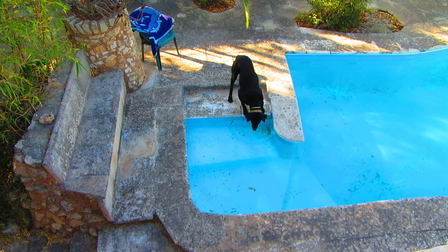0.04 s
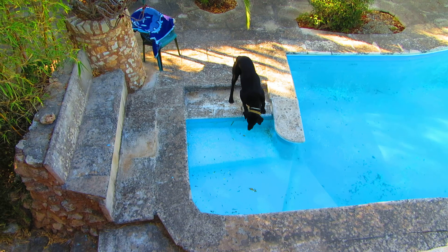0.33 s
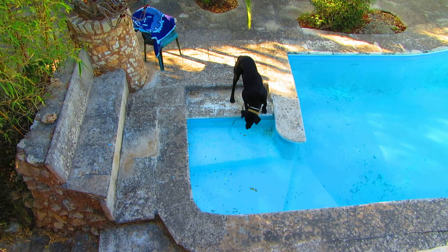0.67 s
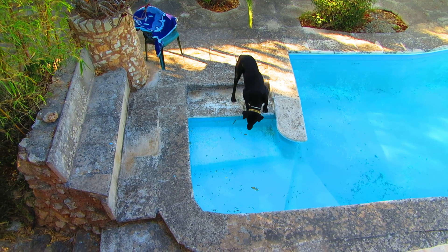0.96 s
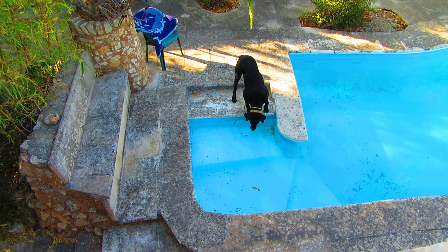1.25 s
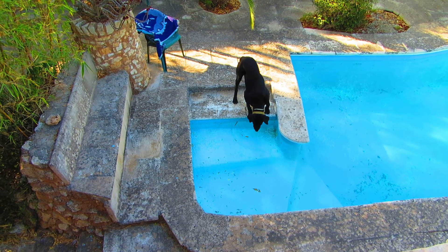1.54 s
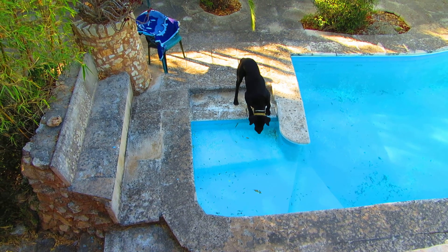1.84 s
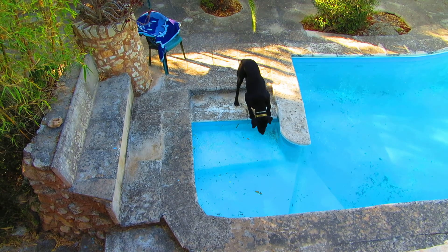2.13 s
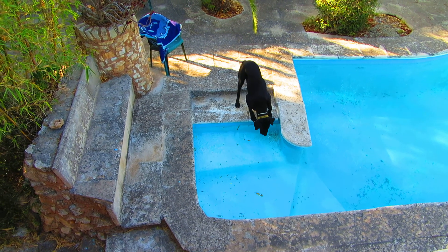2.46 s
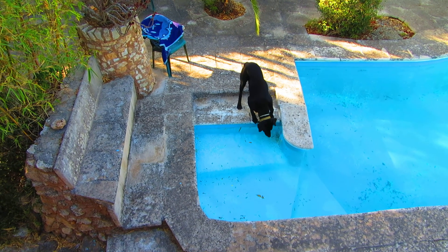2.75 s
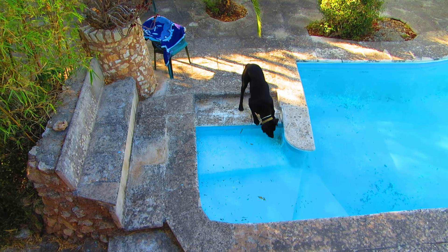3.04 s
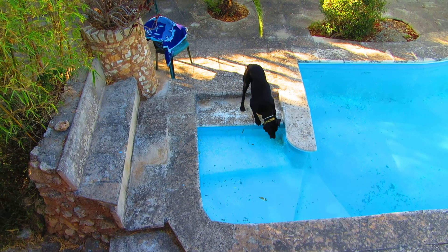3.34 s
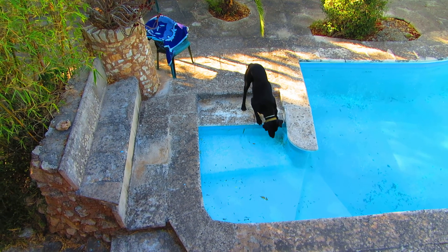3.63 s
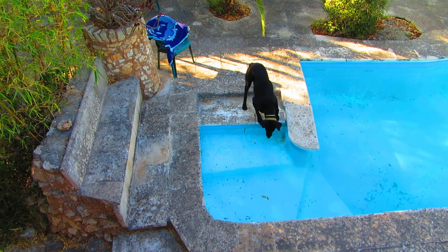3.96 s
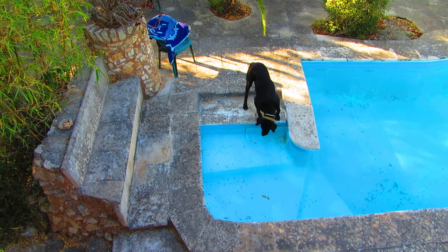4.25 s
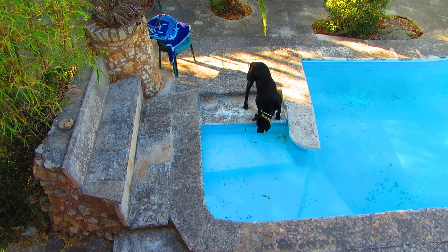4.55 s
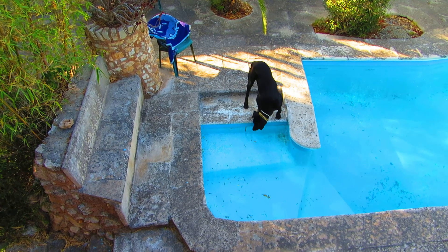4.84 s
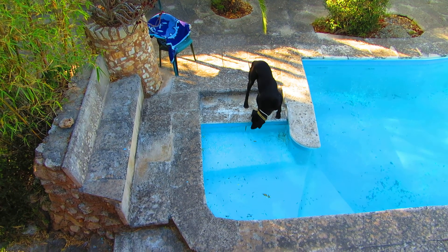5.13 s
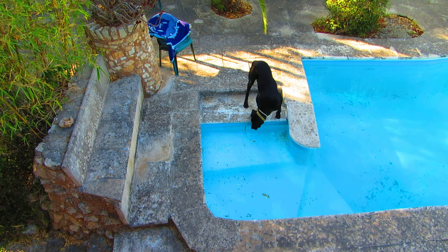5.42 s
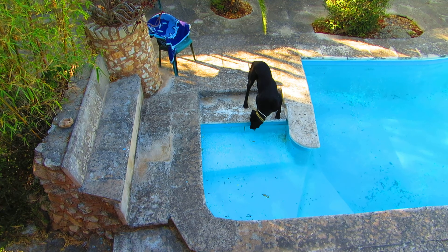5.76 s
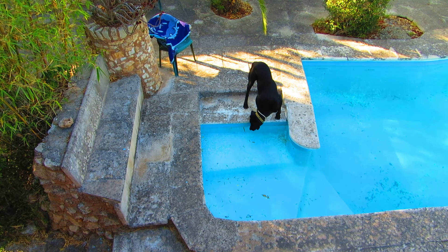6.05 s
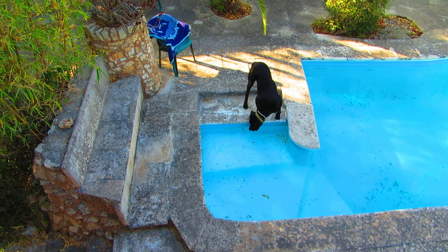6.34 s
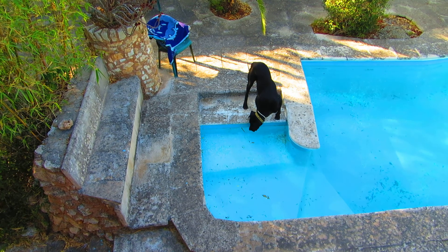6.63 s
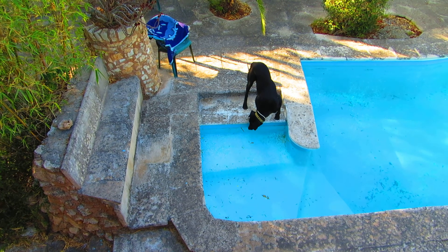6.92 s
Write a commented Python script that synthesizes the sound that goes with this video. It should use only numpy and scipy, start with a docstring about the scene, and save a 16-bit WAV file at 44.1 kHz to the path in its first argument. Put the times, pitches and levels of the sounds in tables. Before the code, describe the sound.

A dog laps water from the step of an outdoor swimming pool, heard from a terrace above and slightly right of centre. The lapping starts right away and keeps an even pace of about three laps a second until the end, at about 7 seconds. Each lap has two quick parts, the tongue slapping in and the jaw closing on the water, making small fizzy splashes, wet clicks, round plops and soft hollow gulps, with little gurgles and drips between. A sharper click stands out at about 0.5 seconds. The laps are somewhat louder from around 3 seconds, with the brightest plops near 5.5 seconds and rounder ones between 5 and 6.6 seconds. Nearby stone adds a faint, short echo. Underneath, a soft, wide outdoor hush and a very faint, thin, high whine rise slightly over the first two seconds, then hold steady.

```python
"""Dog drinking from a pool

A dog laps from the step of a swimming pool, about three laps a second; the microphone is on a terrace
above. Tongue and jaw trap air pockets that plop and click, and the water that falls back splashes in
swarms of tiny bubbles. Stone walls answer faintly, over a soft outdoor hush and a thin camera whine."""
import sys
import numpy as np
from scipy import signal
from scipy.fft import rfft, irfft
from scipy.io import wavfile

SR = 44100
rng = np.random.default_rng(int(sys.argv[2]) if len(sys.argv) > 2 else 0)


def store_pcm(level_fs):
    """Save levels as 16-bit WAV."""
    pcm = np.round(np.clip(level_fs, -1, 1) * 32767).astype(np.int16)
    wavfile.write(sys.argv[1], SR, np.atleast_2d(pcm).T)


N = 312669

# Laps at the pool step: the tongue slaps in, then the jaw snaps shut on the water it lifts.
# tongue_s, splash_db, bright_db, gulp_db, jaw_s, splash_db, bright_db, gulp_db
LAPS = [(.083, -49, 0, -55, .159, -53, 0, -60), (.401, -43, -1, -45, .478, -47, -2, -42),
        (.744, -45, 0, -50, .85, -48, 1, -55), (1.046, -41, -1, -48, 1.162, -48, 0, -55),
        (1.381, -48, 0, -52, 1.479, -42.5, 0, -31), (1.765, -43.5, 2, -38, 1.872, -47, 0, -55),
        (2.086, -43, 0, -40, 2.187, -45, 1, -37), (2.409, -42, 0, -44, 2.494, -42.5, 1, -38),
        (2.77, -45, 2, -43, 2.874, -43, 0, -54), (3.094, -38.5, -1, -36, 3.185, -42, 0, -35),
        (3.423, -38, 0, -41, 3.519, -41.5, -1, -37), (3.796, -42, -1, -43, 3.92, -41, -1, -54),
        (4.14, -36.5, 0, -38, 4.245, -44, -1, -42), (4.463, -41, 2, -35, 4.545, -44.5, 1, -55),
        (4.833, -49, 1, -58, 4.935, -41, 1, -50), (5.147, -39, -2, -55, 5.258, -43, 0, -42),
        (5.519, -42.5, 1, -53, 5.625, -43, -1, -46), (5.845, -39, 0, -38, 5.94, -43.5, -1, -55),
        (6.204, -39, -1, -47, 6.294, -43, -1, -54), (6.523, -36.5, 0, -46, 6.608, -41, 0, -54),
        (6.906, -42.5, -1, -55, 7.005, -41.5, 1, -55)]
# Splash shape of each kind of stroke: attack_s, hold_s, decay_s, slosh_db, splatter_db, spray_db
TONGUE_SHAPE = (0.002, 0.033, 0.028, -3, -2.8, -8.8)
JAW_SHAPE = (0.0015, 0.066, 0.027, -3.4, -1.2, -4.6)
def strokes():
    """Tongue and jaw take turns: start_s, splash_db, bright_db, gulp_db, shape for every stroke."""
    for lap in LAPS:
        yield *lap[:4], TONGUE_SHAPE
        yield *lap[4:], JAW_SHAPE


# Air pockets at the muzzle, dry clicks to round plops: start_s, level_db, pitch_hz, swell_cycles
AIR_POCKETS = [(0.162, -36, 9920, 1.2), (0.242, -47, 2130, 4), (0.275, -42, 2210, 1.3),
               (0.466, -20, 5800, .7), (0.507, -35, 2610, 2.7), (0.669, -36, 2180, .8),
               (0.691, -42, 1105, 3.6), (0.746, -31, 2370, 1), (0.763, -37, 1060, 1.4),
               (0.833, -32, 12000, 1), (0.917, -43, 850, 2), (0.994, -42, 1850, 1), (1.049, -35, 3000, 1),
               (1.091, -42, 604, 3.3), (1.169, -34, 1150, 1.5), (1.229, -33, 1180, 3.5),
               (1.317, -41, 2170, 5), (1.504, -36, 1130, 2), (1.505, -35, 460, 1), (1.549, -32, 1210, 1.5),
               (1.673, -40, 1230, 2.6), (1.733, -40, 600, 1), (1.803, -34, 5300, 2.6),
               (1.886, -32, 3050, 3), (1.894, -34, 2660, 3.4), (2.06, -26, 2950, .7), (2.065, -34, 2200, 2),
               (2.085, -29, 6670, 1.4), (2.122, -34, 4620, 3.7), (2.135, -28, 1250, 3),
               (2.135, -31, 1750, 1.6), (2.257, -34, 1070, 2.6), (2.509, -34, 540, 1.4),
               (2.529, -35, 1030, 1.3), (2.573, -29, 8200, 2.5), (2.776, -23, 1940, 1.4),
               (2.796, -40, 580, 3.7), (2.906, -28, 2100, 2.8), (2.911, -29, 3600, 2),
               (3.185, -33, 2840, 4), (3.251, -31, 6530, 3), (3.26, -30.5, 1090, 2),
               (3.423, -31, 1770, 1.4), (3.428, -33, 1290, 5), (3.459, -30, 1820, 1.3),
               (3.528, -32, 1600, 1.3), (3.797, -24, 1790, 1.3), (3.804, -33, 2740, 4),
               (3.811, -33, 1230, 3), (3.922, -26, 3830, 2.3), (3.942, -31, 1190, 1.3),
               (3.942, -25, 4200, .6), (3.963, -28, 2450, 7), (4.069, -35, 2900, 2), (4.111, -39, 3550, 3),
               (4.144, -28.5, 2360, 1.6), (4.16, -31, 2950, 3), (4.171, -28, 2660, 1.6),
               (4.224, -28, 3280, 1.7), (4.47, -30, 575, 2.1), (4.471, -24, 6500, 1.4),
               (4.471, -27, 2170, .7), (4.617, -39, 960, 2.5), (4.763, -39, 2800, 1.5),
               (4.796, -35, 6800, 1.5), (4.837, -37, 6000, 1.5), (4.855, -35, 650, 2),
               (4.971, -33, 2270, 1.1), (5.003, -33, 1300, 1), (5.106, -37, 3300, 1.3),
               (5.151, -29, 2400, 1), (5.153, -35, 680, 3.5), (5.173, -22, 700, 1), (5.181, -35, 3700, 5),
               (5.26, -25.5, 582, 1.3), (5.261, -28, 3600, 6), (5.295, -33.5, 1210, 1.8),
               (5.308, -32, 3300, 2.5), (5.32, -32, 1153, 2.4), (5.482, -35, 2100, 1.3),
               (5.52, -22.5, 2920, 2.1), (5.534, -18.5, 3400, 1.8), (5.548, -30.5, 687, 1.7),
               (5.625, -20.5, 2830, 3.4), (5.626, -19, 3900, 2), (5.654, -28, 6700, 1.9),
               (5.695, -25, 3400, 1.2), (5.76, -37, 770, 1), (5.872, -31, 655, 2.8),
               (5.883, -28, 2940, 2.6), (5.944, -30, 680, 1.6), (5.993, -31, 820, 1.6),
               (6.015, -34, 1230, 2.5), (6.153, -34, 746, 1.3), (6.206, -26, 1350, .7),
               (6.22, -22, 632, 2.1), (6.228, -28, 2900, 2.1), (6.297, -32, 7000, 1.5),
               (6.344, -30.5, 910, 1.9), (6.37, -28, 1090, 3), (6.37, -25, 3540, 1.8),
               (6.526, -27, 2510, 3.5), (6.526, -26, 4900, 2), (6.559, -28, 596, 1),
               (6.561, -26, 1177, 1.8), (6.614, -29, 3360, 2.7), (6.624, -30, 3050, 2.6),
               (6.699, -28, 1210, .8), (6.848, -41, 830, 1.6), (6.928, -37, 693, 2.7),
               (7.046, -29, 3600, 4)]
def plops(rise=0.018, tick_db=-18, tick_s=0.0028, daughter_db=-17, daughter_wait_s=0.012):
    """Each trapped pocket starts with a wet tick and bursts, leaving a smaller, higher bubble."""
    pockets, ticks = np.zeros(N), np.zeros(N)
    tick_fade = np.exp(-np.arange(SR // 20) / (SR * tick_s))
    for start_s, level_db, hz, cycles in AIR_POCKETS:
        phase, wait, size = rng.random(3)
        add(pockets, start_s, from_db(level_db) * bubble(hz, cycles / hz, rise, phase))
        daughter = bubble(hz * 2 ** (0.4 * size), cycles / hz, rise, wait)
        add(pockets, start_s + daughter_wait_s * (.5 + wait), from_db(level_db + daughter_db) * daughter)
        add(ticks, start_s, from_db(level_db + tick_db) * tick_fade)
    return pockets + ticks * noise(WATER_COLOUR)


# Slosh, splatter and spray at the water's surface: low_hz, high_hz, bubbles_per_s, swell_cycles
SWARMS = [(333, 1520, 900, 1.82), (1512, 5180, 1400, 2.13), (5100, 13400, 1100, 1.11)]
def splashes(gain_db=-5, settle_db=-13, settle_s=0.18):
    """Each stroke wakes all three swarms; they hold, then die down unevenly as the water settles."""
    out, t = np.zeros(N), np.arange(SR) / SR
    settling = from_db(settle_db) * np.exp(-t / settle_s)
    for band, (low_hz, high_hz, per_s, cycles) in enumerate(SWARMS):
        stir = np.zeros(N)
        for start_s, splash_db, bright_db, _, shape in strokes():
            attack_s, hold_s, decay_s, *bands_db = shape
            attack = 1 - np.exp(-t / attack_s)
            fall = np.exp(-np.maximum(t - hold_s, 0) / decay_s)
            level_db = splash_db + bands_db[band] + (band - 0.5) * bright_db + gain_db
            add(stir, start_s, from_db(level_db) * attack * np.maximum(fall, settling))
        out += stir * clumps() * swarm(low_hz, high_hz, per_s, cycles, spread_db=2.6)
    return out


def clumps(spread_db=6.5, step_s=.005):
    """Water breaks up in fits and starts: a unit-power gain that jumps every few milliseconds."""
    steps = np.arange(N) / (step_s * SR)
    jumps = np.interp(steps, np.arange(N), rng.uniform(-1.4, 1, N))
    return unit_power(from_db(spread_db * jumps))


# Colour of the splashing water: frequency_hz, level_db
WATER_COLOUR = [(250, -8), (420, -12), (570, 5), (800, -3.5), (1220, 1), (1700, -2), (2900, -1.5),
                (4500, -5.5), (7000, -5), (10000, -13.5), (15000, -21.5)]
def swarm(low_hz, high_hz, per_s, cycles, spread_db, pitches=20):
    """Tiny bubbles ring at random times, strengths and pitches; unit power."""
    strengths = from_db(spread_db * np.minimum(rng.exponential(1, N), 4)) * rng.choice([-1, 1], N)
    born = rng.random(N) < per_s / SR
    pitch_index = rng.integers(0, pitches, N)
    out = np.zeros(N)
    for k in range(pitches):
        hz = low_hz * (high_hz / low_hz) ** ((k + .5) / pitches)
        grain = bubble(hz, cycles / hz, rise=0.039, phase=0)
        grain *= from_db(level_at(WATER_COLOUR, hz)) * np.sqrt(hz / np.sum(grain ** 2))
        for i in np.flatnonzero(born & (pitch_index == k)):
            add(out, i / SR, strengths[i] * grain)
    return unit_power(out)


def bubble(hz, swell_s, rise, phase):
    """An air pocket swells and dies away; its pitch climbs as it nears the surface."""
    age = np.arange(int(10 * swell_s * SR) + 2) / (swell_s * SR)
    pitch_hz = hz * (1 + rise * (np.minimum(age, 5) - 1.5))
    return age * np.exp(1 - age) * np.sin(2 * np.pi * (np.cumsum(pitch_hz) / SR + phase))


def gulps(cavity_hz=315, muzzle_hz=470, delay_s=0.029, thud_db=-2.5, rebound_db=-11.5, muzzle_db=-4.5):
    """After each stroke a large, damped cavity thuds and rebounds; the muzzle adds a hollow note."""
    out = np.zeros(N)
    for stroke_s, splash_db, _, gulp_db, _ in strokes():
        size, wait, phase = rng.random(3)
        start_s = stroke_s + delay_s
        detune = 2 ** ((size - .5) / 2)
        thud = bubble(cavity_hz * detune, swell_s=0.0012, rise=0.092, phase=phase)
        rebound = bubble(1.15 * cavity_hz * detune, swell_s=0.0012, rise=0.12, phase=wait)
        hollow = bubble(muzzle_hz * detune, swell_s=0.0025, rise=0.03, phase=wait)
        add(out, start_s, from_db(gulp_db + thud_db) * thud)
        add(out, start_s + 0.00603 + 0.00826 * wait, from_db(gulp_db + rebound_db) * rebound)
        add(out, start_s, from_db(splash_db + muzzle_db) * hollow)
    return out


def gurgles(count=5, delay_s=0.05, step_s=0.014, base_hz=1000, octaves_per_s=5, fade_db_per_s=130):
    """Water spilling from the closed jaw makes a short run of bubbles that rise in pitch and fade."""
    out = np.zeros(N)
    for *_, jaw_s, splash_db, _, _ in LAPS:
        for k, (wait, size, phase) in enumerate(rng.random((count, 3))):
            age_s = (k + wait) * step_s
            hz = base_hz * 2 ** (octaves_per_s * age_s + 0.7 * (size - .5))
            gain = from_db(splash_db - fade_db_per_s * age_s)
            add(out, jaw_s + delay_s + age_s, gain * bubble(hz, 2.4 / hz, rise=0.04, phase=phase))
    return out


def drips(gain_db=-62, dribble_db=4.5, lead_s=0.04, width_s=0.035):
    """Stray drops fall from the muzzle throughout; it dribbles as the mouth opens before each lap."""
    t = np.arange(N) / SR
    mouth_open = sum(np.exp(-((t - tongue_s + lead_s) / width_s) ** 2) for tongue_s, *_ in LAPS)
    dribble = from_db(dribble_db) * mouth_open * swarm(1500, 4400, per_s=160, cycles=1.8, spread_db=4)
    strays = swarm(640, 4530, per_s=110, cycles=2.66, spread_db=4.5)
    return from_db(gain_db) * (strays + dribble)


# Resonances of the stone corner beside the dog: pitch_hz, width_hz, gain_db
CORNER_MODES = [(571.7, 15, -2), (1217, 8, -2), (365, 6.8, -4.5)]
def corner(water):
    """The stone corner of the step rings on at a few pitches."""
    return sum(from_db(db) * resonance(water, hz, width_hz) for hz, width_hz, db in CORNER_MODES)


def wall_echoes(water, gain_db=-2, t60_s=0.36, early_db=17, early_s=0.0032, block=4096):
    """Quick reflections and a faint tail keep changing as the head moves and the water ripples."""
    t = np.arange(SR // 3) / SR
    decay = (from_db(-60 * t / t60_s) + from_db(early_db) * np.exp(-t / early_s)) * (t > .0012)
    window = np.sin(np.pi * np.arange(block) / block)
    padded = np.pad(water, (0, block))
    out = np.zeros((2, N))
    for channel in out:
        for i in range(0, N, block // 2):
            echoes = rng.standard_normal(len(t)) * decay
            echoes /= np.linalg.norm(echoes)
            add(channel, i / SR, signal.fftconvolve(window * padded[i:i + block], echoes))
    return from_db(gain_db) * out


# Open air on the terrace, mid and side at the microphone: frequency_hz, level_db
HUSH_MID = [(20, -17), (75, 0), (120, -6.5), (170, -7.5), (290, -9), (365, -6), (470, -13), (680, -5.5),
            (1200, -9), (2200, -11.5), (3600, -15), (6000, -17), (10000, -23), (15500, -28.5)]
HUSH_SIDE = [(20, 4), (48, 4), (100, 1), (250, 4.5), (480, 1.5), (680, 4.5), (1100, 2.5), (2000, -2),
             (3600, -8), (6000, -12.5), (10000, -18), (15500, -26.5)]
def hush(mid_db=-54.5, side_db=-47):
    """A wide outdoor hush: one noise common to both channels, a stronger one opposed between them."""
    return from_db(mid_db) * noise(HUSH_MID) + from_db(side_db) * noise(HUSH_SIDE) * [[1], [-1]]


# Two high tones as heard, harmonics 1 and 2: level_db, balance_db, right_lead_rad, waver_depth
WHINE_HARMONICS = [(-67, -13, 1, 0.14), (-70, -11, 0.068, 0.5)]
def whine(pitch_hz=7867, waver_hz=11):
    """Two thin, high tones of camera whine; the upper one wavers, the lower one barely."""
    out, t = np.zeros((2, N)), np.arange(N) / SR
    for harmonic, (level_db, balance_db, lead_rad, depth) in enumerate(WHINE_HARMONICS, 1):
        tone = np.sqrt(2) * np.sin(2 * np.pi * harmonic * pitch_hz * t + np.array([[0], [lead_rad]]))
        # the upper tone is heard to waver, the lower one barely
        waver = 1 + depth * np.sin(2 * np.pi * waver_hz * t)
        out += from_db(level_db) * pan(balance_db) * tone * waver
    return out


def from_db(db):
    """Decibels to gain."""
    return 10 ** (np.asarray(db) / 20)


def unit_power(x):
    """Scale to an rms of one."""
    return x / np.sqrt(np.mean(x ** 2) + 1e-20)


def level_at(spectrum, hz):
    """Read a spectrum's level in dB along a log-frequency axis."""
    freqs, levels = np.transpose(spectrum)
    return np.interp(np.log(np.maximum(hz, 1)), np.log(freqs), levels)


def pan(balance_db):
    """Left and right gains for a left-minus-right level."""
    return from_db(np.array([[.5], [-.5]]) * balance_db)


def add(track, start_s, sound):
    """Mix a sound into a track at a time."""
    start = max(0, round(start_s * SR))
    part = track[start:start + len(sound)]
    part += sound[:len(part)]


def noise(spectrum):
    """Steady noise of a given colour, unit power."""
    hz = np.arange(N // 2 + 1) * SR / N
    white = rfft(rng.standard_normal(N))
    return unit_power(irfft(white * from_db(level_at(spectrum, hz)), N))


def resonance(x, hz, width_hz):
    """Two-pole resonance with gain 1 at its peak."""
    radius = np.exp(-np.pi * width_hz / SR)
    feedback = [1, -2 * radius * np.cos(2 * np.pi * hz / SR), radius ** 2]
    return signal.lfilter(np.array([1, 0, -1]) * (1 - radius ** 2) / 2, feedback, x)


def scene():
    """From the terrace the dog is a little right of centre; drips, hush and whine start low and rise."""
    rise_db, rise_s = 5.5, 1.05
    fade_up = from_db(-rise_db * np.exp(-np.arange(N) / SR / rise_s))
    water = plops() + gulps() + splashes() + gurgles() + fade_up * drips()
    at_step = (water + corner(water)) * pan(balance_db=-2)
    return at_step + wall_echoes(water) + fade_up * (hush() + whine())


def record(dry):
    """The sound sets in after a moment of silence; the top is cut steeply."""
    start_s, cutoff_hz = 0.07, 16100
    lowpass = signal.ellip(12, .1, 80, cutoff_hz, fs=SR, output="sos")
    return signal.sosfilt(lowpass, dry * (np.arange(N) > start_s * SR))


dry = scene()
out = record(dry)
store_pcm(out)
```